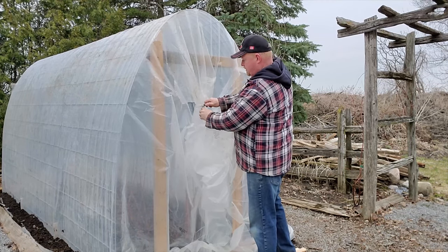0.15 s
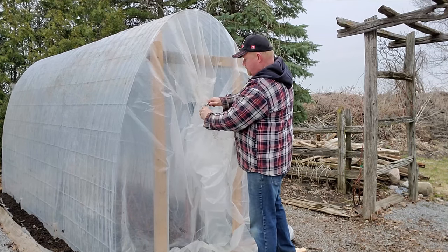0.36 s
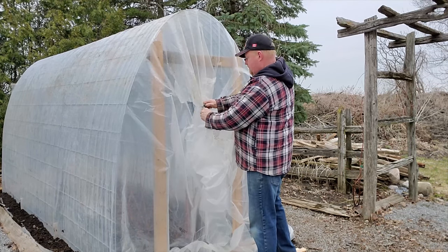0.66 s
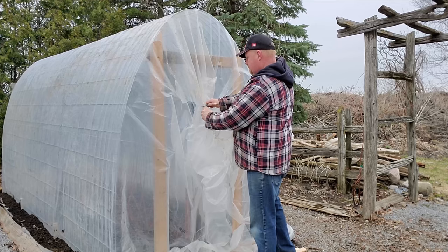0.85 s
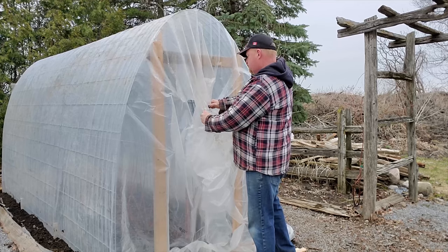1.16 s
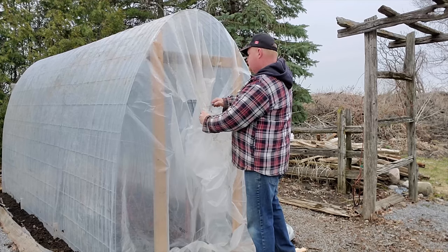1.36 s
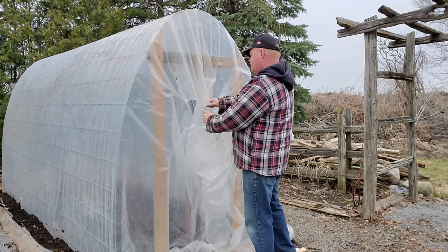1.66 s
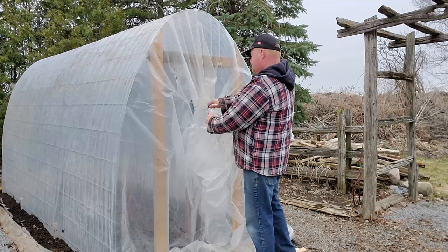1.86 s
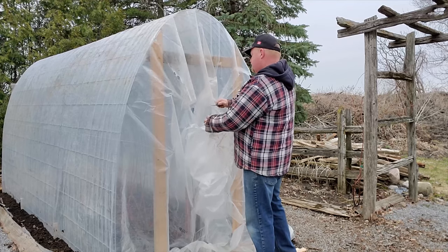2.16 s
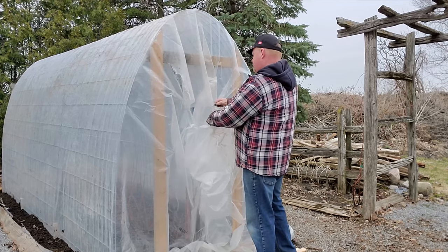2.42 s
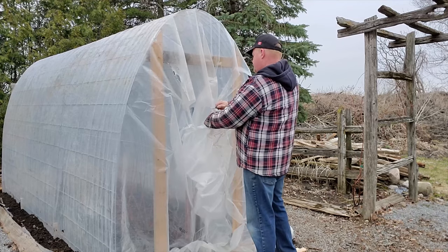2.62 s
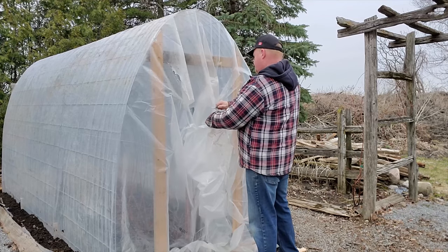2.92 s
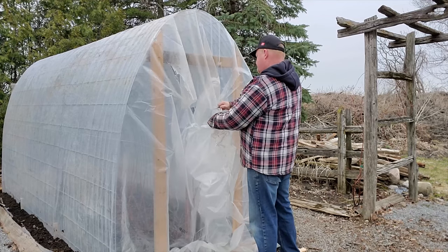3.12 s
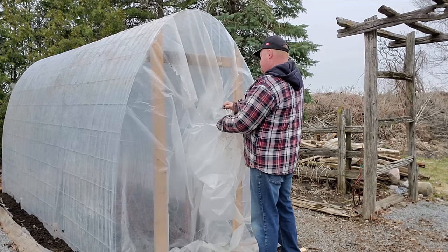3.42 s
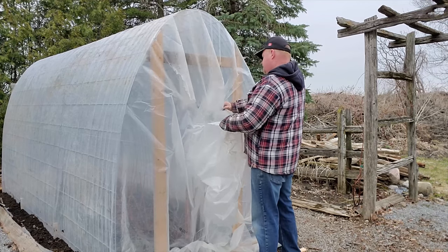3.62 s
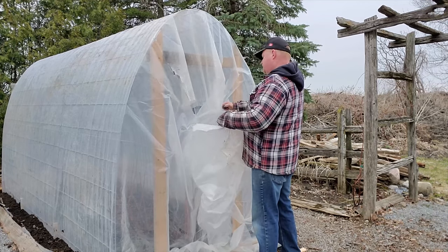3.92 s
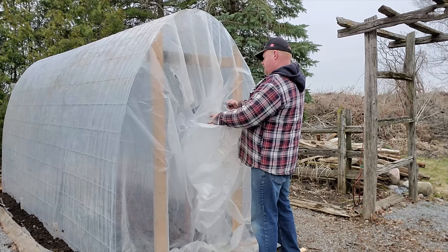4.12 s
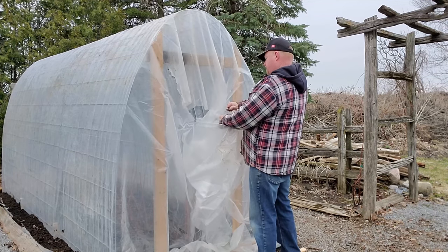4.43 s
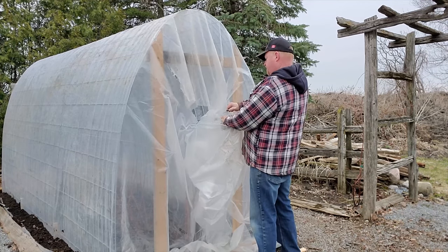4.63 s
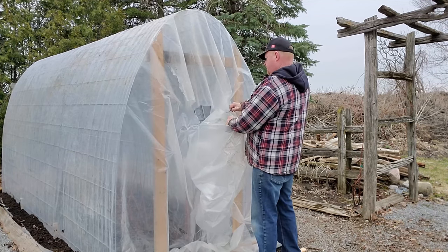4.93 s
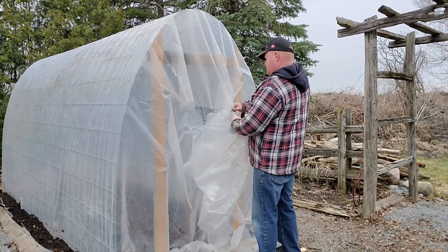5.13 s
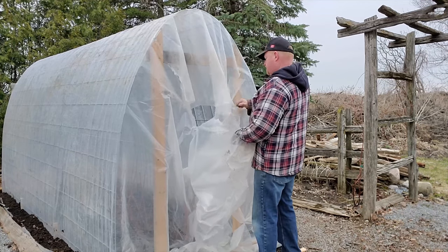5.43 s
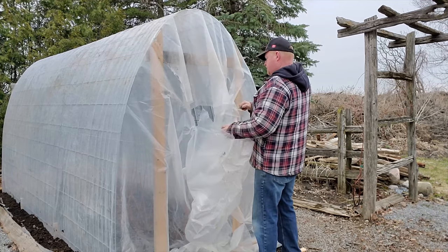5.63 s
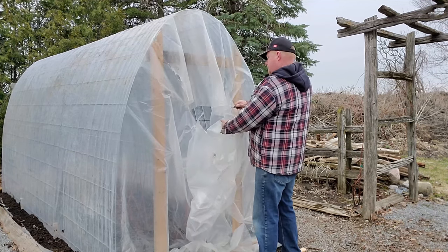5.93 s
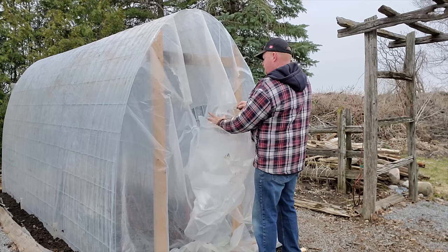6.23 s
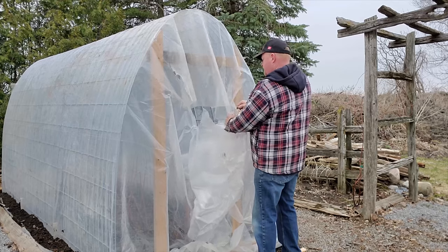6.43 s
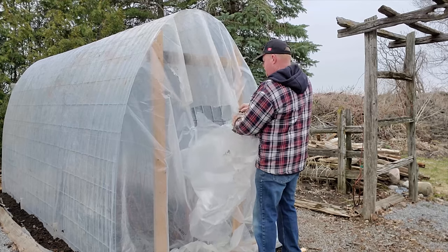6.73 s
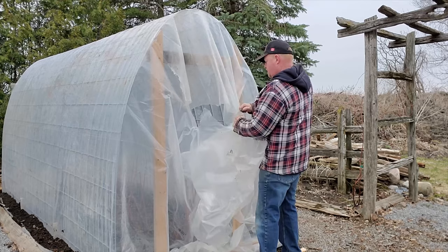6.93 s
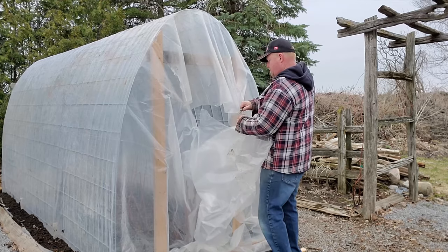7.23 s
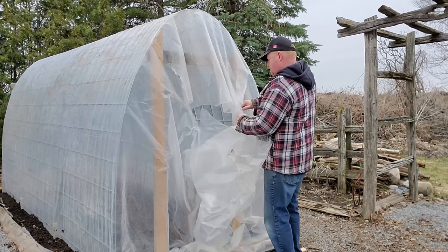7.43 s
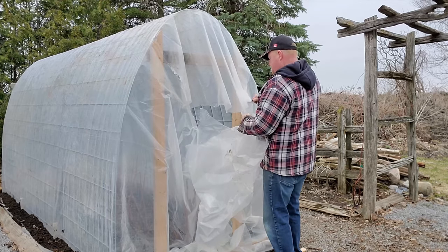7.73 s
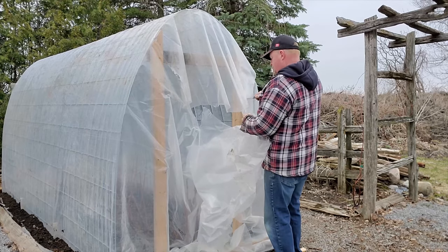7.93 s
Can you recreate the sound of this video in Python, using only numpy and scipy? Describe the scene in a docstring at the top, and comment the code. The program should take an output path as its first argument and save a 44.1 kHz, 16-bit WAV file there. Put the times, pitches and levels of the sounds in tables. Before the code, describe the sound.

Loose plastic sheeting is gathered and tugged by hand outdoors, crinkling and snapping in uneven bursts over a low rumble, with occasional faint bird chips.

```python
"""End of a garden hoop house: clear plastic sheeting is gathered and tugged by hand a few metres away.
Creases snap as short noise bursts; swarms of random wrinkle clicks crackle; small folds pop as brief notes.
The loose sheet flaps and billows as filtered clicks that follow each pull; a high fizz follows more evenly.
Behind it: a low outdoor rumble, steady air noise, gusty breeze noise and the faint chips and whistles of birds."""
import sys
import numpy as np
from scipy import signal
from scipy.fft import rfft, irfft
from scipy.io import wavfile
from scipy.ndimage import uniform_filter1d

SR = 44100
rng = np.random.default_rng(int(sys.argv[2]) if len(sys.argv) > 2 else 0)


def wrap_up_sound(samples):
    """Save the sound to the file named by the first command line argument, as 16-bit audio."""
    columns = np.atleast_2d(samples).T
    # keep every value between -1 and 1, then stretch to whole-number steps
    tamed = np.clip(columns, -1, 1)
    steps = np.round(tamed * 32767).astype(np.int16)
    wavfile.write(sys.argv[1], SR, steps)


N = 355710
TIME = np.arange(N) / SR

# creases that snap: (time [s], relative crack level [dB], fold tightness [dB],
#                     tick relative to crack [dB])
CREASE_SNAPS = [(0.1053, -39.5, 1, -33), (0.1264, -43.5, -7, -18), (0.144, -42.5, 14, -17),
                (0.211, -41.5, 16, -16), (0.235, -40, -3, -24), (0.2886, -38, 11, -22),
                (0.3648, -37, 2, -22), (0.4146, -40.5, 0.5, -11), (0.5274, -40, 5, -24),
                (0.6352, -40.5, 10, -15), (0.719, -45, 3, -30), (0.7655, -52, 15, -3),
                (0.7851, -46.5, 0, -13), (0.8549, -40.5, 5, -14), (0.9548, -37.5, 0, -19),
                (0.9931, -29, 19, -17), (1.0194, -37, -5, -26), (1.044, -34.5, -15, -28),
                (1.2157, -47.5, -3, -30), (1.2567, -46, -1, -17), (1.334, -38, 1, -27),
                (1.4408, -56, 12, -9), (1.545, -52.5, 5, -8), (1.6136, -45.5, 11, -13),
                (1.669, -40, 36, -10), (1.8641, -21.5, 1.5, -32), (1.8686, -30.5, -2, -16),
                (1.8926, -30, -3, -11.5), (1.9663, -41, 4, -28), (2.1121, -45, -5.5, -30),
                (2.2295, -44, -5, -30), (2.3742, -45, 4, -26), (2.434, -36, -3.5, -15),
                (2.4885, -43.5, 1, -34), (2.5193, -35.5, 1, -22), (2.5626, -39, -1, -34),
                (2.5793, -46, -1, -32), (2.681, -43.5, 32, -12), (2.8327, -48, -4, -32),
                (2.8608, -40.5, 0.5, -10), (2.9224, -45.5, -8.5, -9), (2.9414, -47, -2, -3.5),
                (2.9995, -30, -2, -12.5), (3.0465, -25, 4.5, -13.5), (3.0876, -39.5, 8, -9),
                (3.1038, -41, -10, -9), (3.1253, -23, -6, -8.5), (3.207, -38.5, 0, -9),
                (3.3483, -24, -1.5, -9.5), (3.3723, -29.5, 7, -14), (3.4029, -28, 31, -9.5),
                (3.5177, -41.5, -13.5, -13.5), (3.6252, -29, -14, -13), (3.6354, -27.5, 0, -5),
                (3.6842, -28, -9, -14), (3.7557, -21.5, 1, -18), (4.1448, -41, -2, -29),
                (4.1708, -32.5, 10, -40), (4.2126, -34, 11, -18), (4.287, -35, 3, -11),
                (4.3575, -39, 4, -28), (4.432, -43.5, 7, -11), (4.501, -41.5, 6, -35),
                (4.654, -54.5, -9, -34), (4.775, -49, -1, -32), (4.8009, -33, 2, -20),
                (4.8074, -39, 7, -21), (4.8476, -27, 9, -22), (4.9948, -28.5, -5, -12),
                (5.0002, -27, 5, -19), (5.0577, -40, 4, -15), (5.1253, -37, 0, -8), (5.2099, -28, -6, -3.5),
                (5.2168, -34.5, 7, -1), (5.2385, -24.5, 5, -10), (5.2667, -28.5, -10.5, -13),
                (5.3041, -32, -10.5, -25), (5.39, -47, -5, -13), (5.7278, -39.5, 6, -31),
                (5.846, -32, -3, -15), (5.9938, -35, -6, -30), (6.2882, -47.5, -6, -12),
                (6.3182, -38.5, -6.5, -30), (6.3492, -35, 0, -28), (6.3784, -35.5, 15, -11),
                (6.394, -32.5, 14, -29), (6.5447, -44, -1, -20), (6.6533, -44, -5.5, -17),
                (6.9051, -39.5, -2, -32), (6.9796, -48, -4, -10), (7.1163, -34.5, -9, -22),
                (7.3426, -41.5, 12, -12), (7.4233, -36, 20, -16), (7.4592, -31.5, -7, -13),
                (7.4728, -28.5, 0, -18), (7.478, -25.5, -5, -18), (7.5987, -37, -14, -22),
                (7.6834, -38.5, -7, -10), (7.852, -52, -18.5, -32), (7.9238, -48, -10, -19),
                (8.053, -40.5, 15, -9)]
# filter curves of crinkle, broad-fold flap, high fizz, low rumble: (frequency [Hz], level [dB per Hz])
CRINKLE_SPECTRUM = [(250, -34), (550, -6.5), (800, 0), (1600, -1.5), (2700, -5), (4400, -7), (5500, -13.5),
                    (6800, -18), (8000, -32.5), (16000, -32)]
FLAP_SPECTRUM = [(60, 2.5), (130, -4), (200, 1), (320, 3), (500, -1), (650, -5), (900, -12), (2000, -30.5),
                 (6000, -105)]
FIZZ_SPECTRUM = [(3000, -57), (6000, 6), (7500, 0), (10000, -0.5), (12500, 1.5), (15500, 0)]
RUMBLE_SPECTRUM = [(12, -36), (28, -30), (45, -5.5), (68, -1.5), (95, -5.5), (122, -8.5), (150, -25.5),
                   (300, -37), (1000, -79)]


def amp(db):
    """Decibels to linear gain."""
    return 10 ** (np.asarray(db) / 20)


def unit(x):
    """Scales to rms 1."""
    return x / np.sqrt(np.mean(x ** 2) + 1e-20)


def read(points, hz):
    """Reads a spectrum in dB on a log-frequency axis."""
    f, value_db = np.transpose(points)
    return np.interp(np.log(hz + 1), np.log(f + 1), value_db)


def follow(rows, axis):
    """One dB column of a curve, as a gain at every sample."""
    rows = np.array(rows)
    return amp(np.interp(TIME, rows[:, 0], rows[:, axis]))


def colour(x, points, size=4096):
    """Causal minimum-phase filter with the given spectrum, so that attacks stay sharp."""
    hz = abs(np.fft.fftfreq(size, 1 / SR))
    log_gain = np.log(amp(read(points, hz)))
    response = np.exp(np.conj(signal.hilbert(log_gain)))
    taps = np.fft.ifft(response).real[:size // 2]
    taps = taps.reshape((1,) * (x.ndim - 1) + (-1,))
    return signal.oaconvolve(x, taps, axes=-1)[..., :x.shape[-1]]


def steadied(x, span_s):
    """Evens out the level over the span, judged on the mid channel, and keeps the finer grain."""
    size = int(span_s * SR) + 1
    power = uniform_filter1d(uniform_filter1d(x[0] ** 2, size), size)
    return x / np.sqrt(abs(power) + 1e-3 * power.mean())


def add(mix, start_s, sound):
    """Mixes a sound in at its start time."""
    part = mix[:, max(round(start_s * SR), 0):][:, :sound.shape[1]]
    part += sound[:, :part.shape[1]]


def air_noise(level_db=-59):
    """Steady outdoor air: filtered noise, independent at each microphone."""
    # (frequency [Hz], level [dB per Hz])
    air_spectrum = [(30, -3.5), (120, -2), (160, -7), (330, -11.5), (700, -8), (1700, -13.5), (3300, -8.5),
                    (5000, -16.5), (8000, -46), (12000, -51), (16000, -27)]
    return amp(level_db) * unit(colour(rng.standard_normal((2, N)), air_spectrum))


def breeze(gust_db=1.5, size=1700):
    """Eddies buffet each microphone on its own, under shared gusts."""
    # (time [s], level [dB])
    breeze_level = [(0, -73), (5.5, -55.5), (6.3, -57), (6.72, -46), (6.87, -64), (7.3, -46.5),
                    (7.6, -39.5), (8.07, -37.5)]
    gusts = unit(uniform_filter1d(uniform_filter1d(rng.standard_normal(N), size), size))
    eddies = colour(rng.standard_normal((2, N)), RUMBLE_SPECTRUM, size=16384)
    eddies = eddies * amp(gust_db * np.clip(gusts, -2, 2))
    return follow(breeze_level, axis=1) * unit(eddies)


def bird(chip_s=0.046, fall=0.086, rasp=0.15, lower=.84, lower_db=-2, lag_s=0.007, waver_hz=150, size=12):
    """Raspy chips from the two sides of the syrinx, sliding down in pitch; thin rising whistles of far birds."""
    # (time [s], level [dB], pitch [Hz])
    chips = [(.888, -58, 3280), (1.449, -56, 3390), (2.611, -53, 3280), (3.568, -49, 3380),
             (4.361, -47, 3320), (5.501, -48.5, 3426)]
    # (time [s], length [s], level [dB], start pitch [Hz], end pitch [Hz])
    whistles = [(4.66, .065, -67, 4080, 4380), (4.65, .14, -69, 1680, 1780)]
    out = np.zeros((2, N))
    u = np.arange(0, 1, 1 / (chip_s * SR))
    for s, db, hz in chips:
        voices = ((s, db, hz), (s + lag_s, db + lower_db, hz * lower))
        for start_s, voice_db, voice_hz in voices:
            jitter = unit(uniform_filter1d(rng.standard_normal((2, len(u))), size))
            pitch_hz = voice_hz * (1 + fall * (.5 - u) + rasp * jitter)
            turns = np.cumsum(pitch_hz, axis=1) / SR
            chip = np.sin(np.pi * u) * np.sin(2 * np.pi * turns)
            add(out, start_s, amp(voice_db) * unit(chip))
    for s, length_s, db, start_hz, end_hz in whistles:
        u = np.arange(0, 1, 1 / (length_s * SR))
        waver = unit(uniform_filter1d(rng.standard_normal(len(u)), size))
        turns = np.cumsum(start_hz + (end_hz - start_hz) * u + waver_hz * waver) / SR
        whistle = np.sin(np.pi * u) * np.sin(2 * np.pi * turns)
        add(out[:1], s, amp(db) * unit(whistle)[None])
    return out


def pulled(part="crinkle", step=64):
    """How hard one part of the sound is driven: each pull or snap rises, holds and fades; powers add."""
    # pulls of the hands: (start [s], rise [s], hold [s], fade [dB/s], strength [dB],
    #                      broad-fold weight [dB], high-fizz weight [dB])
    tugs = [(0.0, 0.013, 0.1, 150, -51, -7.5, 1), (0.19, 0.015, 0.069, 300, -46, -14, -10),
            (0.391, 0.017, 0.018, 154, -49.5, 0, 4), (0.579, 0.064, 0.0046, 282, -43.5, -2.5, 9),
            (0.705, 0.0092, 0.044, 260, -54.5, 0.5, 1), (0.948, 0.051, .042, 420, -29.5, -3.5, -5),
            (1.069, 0.023, 0.031, 217, -49, 1.5, 7), (1.448, 0.022, 0.013, 250, -68.5, -2, 10),
            (1.525, 0.026, 0.031, 220, -56.5, -2, 1), (1.855, 0.0067, 0.04, 228, -33, -15, -14),
            (1.913, 0.043, 0.046, 238, -39.5, -1, -4), (2.063, 0.049, 0.17, 58, -52.5, -1, 3.5),
            (2.354, .02, 0.073, 164, -47, -2, -6), (2.554, .01, 0.005, 330, -48, -5, -1),
            (2.996, .004, 0.0051, 300, -37.5, 3, 2), (3.064, 0.039, 0.0067, 224, -45.5, 6, 7),
            (3.343, 0.009, .02, 250, -33, -1, 3), (3.622, 0.0044, 0.08, 192, -31, -2, 0),
            (3.788, 0.035, 0.062, 113, -46, -0.5, 4), (3.98, 0.024, .05, 100, -54.5, 1.5, 4),
            (4.131, 0.054, 0.03, 220, -42, -1, -6), (4.328, 0.013, 0.021, 124, -52.5, -4, 7),
            (4.796, 0.0064, 0.034, 240, -37.5, -5.5, -5), (4.919, 0.091, 0.016, 146, -40, -2, -3),
            (5.124, .1, 0.048, 171.5, -27, -3, 0.5), (5.458, 0.038, 0.018, 79, -51, -1, 5),
            (5.708, 0.015, .09, 67, -48, 0, 1), (5.821, 0.027, 0.12, 330, -39.5, -3.5, 0),
            (6.072, 0.033, 0.075, 54, -56, 2.5, 3), (6.273, 0.09, 0.05, 114, -37.5, -4.5, 1),
            (6.527, 0.028, 0.17, 42, -54, -0.5, 0), (6.89, .01, 0.06, 220, -61, 0, 11),
            (7.044, 0.032, 0.017, 120, -54.5, 5.5, -8), (7.117, .01, 0.13, 74, -63.5, 9.5, 17),
            (7.215, 0.033, 0.23, 82, -48, 3, 7.5), (7.442, .025, 0.035, 95, -33, 1, -3),
            (7.571, 0.011, 0.067, 328, -39.5, -14, 5), (7.932, 0.087, .08, 100, -57, 6, 3)]
    # every snap leaves the wrinkles around it stirring for a moment
    stir_db, stir_rise_s, stir_fade_db_per_s = -14.5, .003, 197
    stirs = [(s, stir_rise_s, 0, stir_fade_db_per_s, crack_db + stir_db, -tight_db / 2, 0)
             for s, crack_db, tight_db, _ in CREASE_SNAPS]
    t = TIME[::step]
    power = np.zeros(len(t))
    for start_s, rise_s, hold_s, fade_db_per_s, db, broad_db, fizz_db in tugs + stirs:
        weight_db = {"crinkle": 0, "folds": broad_db, "fizz": fizz_db}[part]
        fading_s = np.maximum(t - start_s - rise_s - hold_s, 0)
        faded_db = np.minimum(fade_db_per_s * fading_s, 100)
        rise = np.clip((t - start_s) / rise_s, 0, 1)
        power += (rise * amp(db + weight_db - faded_db)) ** 2
    return np.interp(TIME, t, np.sqrt(power) + 1e-6)


def flapped(lag_s):
    """The swing of the broad folds, lagging the hands."""
    return np.interp(TIME - lag_s, TIME, pulled("folds"))


def fizz_level(level_db=-58.5, pull_db=-43, slope=0.61, max_fall_db_per_s=131):
    """Level of the high fizz: a compressed follower of the pulls and snaps, with a limited rate of fall."""
    db = level_db + slope * (20 * np.log10(pulled("fizz")) - pull_db)
    fall_db = max_fall_db_per_s * TIME
    return amp(np.maximum.accumulate(db + fall_db) - fall_db)


def wrinkles(per_s, spread_db, cap, gentle_db=-45, crowding=.7):
    """Random instants at which wrinkles give way: most weak, a few strong, more of them in a hard crumple."""
    busy = np.clip((pulled() / amp(gentle_db)) ** crowding, .8, 5)  # scales the base rate per_s
    sizes_db = spread_db * np.minimum(rng.exponential(1, N), cap)
    sizes = amp(sizes_db) / np.sqrt(busy)
    return sizes * (rng.random(N) < busy * per_s / SR)


def facets(clicks, ring_s, scatter_db, scatter_s, count=96, size=1024):
    """Each click shakes one of many facets: a brief burst, then a ripple scattered by the folds (mid, side)."""
    t = np.arange(size) / SR
    which = rng.integers(0, count, N)
    envelope = np.exp(-t / ring_s) + amp(scatter_db) * np.exp(-t / scatter_s)
    shakes = rng.standard_normal((count, 2, size)) * envelope
    out = np.zeros((2, N))
    for i in np.flatnonzero(clicks):
        add(out, i / SR, clicks[i] * shakes[which[i]])
    return out


def billow(lag_s=0.036, pull_db=-4, rumble_db=-59, sway_s=0.021):
    """The sheet shoves the air in uneven lumps after pulls and in sways, over a steady low rumble."""
    # the loose sheet sways and shoves the air once: (time [s], level [dB])
    sways = [(.11, -51), (.22, -52), (.43, -42), (.53, -47), (.645, -45.5), (1.015, -37), (1.62, -44.5),
             (1.93, -37), (2.23, -48), (2.34, -48), (2.77, -48), (3.36, -41), (3.78, -42), (4.59, -50),
             (4.89, -46), (5.09, -44), (5.35, -33.5), (6.01, -42), (7.0, -45)]
    shoves = wrinkles(per_s=130, spread_db=1.5, cap=3.7) * rng.standard_normal((2, N))
    lumps = colour(shoves, RUMBLE_SPECTRUM, size=16384)
    # sway_s is half the length of one sway
    swaying = sum((amp(db) * np.exp(-((TIME - s) / sway_s) ** 2 / 2)) ** 2 for s, db in sways)
    power = (amp(pull_db) * flapped(lag_s)) ** 2 + swaying + amp(rumble_db) ** 2
    return np.sqrt(power) * steadied(lumps, span_s=0.049)


def ping(t, hz, cycles):
    """The note of one fold: it swells within a cycle and dies over several."""
    return (1 - np.exp(-t * hz)) * np.exp(-t * hz / cycles) * np.sin(2 * np.pi * hz * t)


def pops(cycles=7, width=0.39, size=3000):
    """Broad folds pop over, each with a hollow decaying note."""
    # (time [s], level [dB], pitch [Hz])
    fold_pops = [(0.382, -45, 1070), (0.413, -33, 1760), (0.477, -38, 2000), (0.507, -40, 1450),
                 (1.016, -29.5, 225), (1.0445, -34, 487), (1.884, -31.5, 199), (2.114, -37, 1140),
                 (3.608, -33, 910), (3.849, -29.5, 1374), (5.848, -23.5, 1340), (6.287, -28, 1460),
                 (6.319, -29, 1425), (7.116, -43, 474), (7.474, -24, 863), (7.599, -25.5, 760),
                 (7.681, -25, 1360)]
    t = np.arange(size) / SR
    out = np.zeros((2, N))
    for s, db, hz in fold_pops:
        add(out, s, amp(db) * ping(t, hz, cycles) * np.array([[1], [width]]))
    return out


def crackle(low_hz=380, high_hz=4300, cycles=8.7, count=36, size=1500):
    """Small folds pop over at random, each with a pitch and a direction of its own."""
    clicks = wrinkles(per_s=420, spread_db=4.5, cap=3.0) * rng.choice([-1., 1.], N)
    t = np.arange(size) / SR
    hz = np.geomspace(low_hz, high_hz, count)[:, None]
    notes = ping(t, hz, cycles) * (hz / low_hz) ** 0.96  # smaller folds flip faster and harder
    which, side = rng.integers(0, count, N), rng.standard_normal(N)
    out = np.zeros((2, N))
    for i in np.flatnonzero(clicks):
        add(out, i / SR, clicks[i] * np.outer([1, side[i]], notes[which[i]]))
    return amp(-6.0) * pulled() * steadied(out, span_s=0.041)


def ticks(gentle_db=-45, growth=0.92):
    """Tight little creases click out above the rustle, most clearly when the touch is light."""
    clicks = wrinkles(per_s=70, spread_db=3.0, cap=2.2)
    clicked = colour(facets(clicks, ring_s=.0007, scatter_db=-18, scatter_s=.003), CRINKLE_SPECTRUM)
    level = amp(gentle_db) * (pulled() / amp(gentle_db)) ** growth
    return amp(-5) * level * unit(clicked)


def bursts(spectrum, ring_s, tail_db, tail_s, rise_s, jolt, size=4096, jolt_sample=9):
    """One burst a snap: the jolt of the flipping crease, then the ripple that runs on through the sheet."""
    t = np.arange(size) / SR
    decay = np.exp(-t / ring_s) + amp(tail_db) * np.exp(-t / tail_s)
    shape = (1 - np.exp(-t / rise_s)) * decay
    count = len(CREASE_SNAPS)
    drive = rng.standard_normal((count, 2, size)) * shape / np.linalg.norm(shape)
    drive[:, 0, jolt_sample] += jolt * rng.choice([-1., 1.], count)  # mid only: equal at both microphones
    return colour(drive, spectrum)


def headed(x, size):
    """Gives every burst rms 1 over its first samples."""
    return x / np.sqrt(np.mean(x[..., :size] ** 2, axis=-1, keepdims=True))


def snaps(split_hz=2500, thud_db=-9.5, width=0.55):
    """A crease flips: a tick, a crack that is brighter the tighter the fold, and a thud that is softer."""
    s, crack_db, tight_db, tick_db = np.array(CREASE_SNAPS).T[:, :, None, None]
    crack = bursts(CRINKLE_SPECTRUM, ring_s=.0022, tail_db=-12, tail_s=.008, rise_s=.00008, jolt=.6)
    tick = bursts(FIZZ_SPECTRUM, ring_s=0.0027, tail_db=2, tail_s=0.0068, rise_s=.00005, jolt=1.0)
    thud = bursts(FLAP_SPECTRUM, ring_s=0.0026, tail_db=-26, tail_s=0.0071, rise_s=0.00014, jolt=0.7)
    low_pass = signal.butter(2, split_hz, "low", fs=SR, output="sos")
    high_pass = signal.butter(2, split_hz, "high", fs=SR, output="sos")
    dull = headed(signal.sosfilt(low_pass, crack), size=264)
    bright = headed(signal.sosfilt(high_pass, crack), size=264)
    # minus: the two halves are in antiphase at the split
    sound = amp(crack_db + 1.36) * headed(dull - amp(tight_db) * bright, size=264)
    sound += amp(crack_db + tick_db + 2.5) * headed(tick, size=264)
    sound += amp(crack_db + thud_db - tight_db) * headed(thud, size=528)
    out = np.zeros((2, N))
    for start_s, snap in zip(s.ravel(), sound):
        add(out, start_s, snap)
    return out * np.array([[1], [width]])  # snaps come from the hands, nearer the middle than the rustle


def tautened(x, hollow_hz=700, crisp_hz=3300):
    """Taut plastic sounds crisp, slack plastic hollow: two broad bands trade level."""
    # (time [s], tautness [dB])
    tautness = [(0, -0.5), (.6, 2), (1.05, 0.5), (1.9, -2), (2.5, -1.5), (3.1, -0.5), (3.8, -2.5),
                (4.3, -2.5), (5.2, 0), (6, -2), (6.4, -1.5), (6.8, -4.5), (7.2, -2), (7.6, -2)]
    hz = np.fft.rfftfreq(N, 1 / SR) + 1
    spectrum, taut = rfft(x), follow(tautness, axis=1)
    hollow = irfft(spectrum * np.exp(-2 * np.log(hz / hollow_hz) ** 2), N)
    crisp = irfft(spectrum * np.exp(-2 * np.log(hz / crisp_hz) ** 2), N)
    return x + hollow * (1 / taut - 1) + crisp * (taut - 1)


def shaded(x, size=512):
    """Shifting folds aim some pitches at the microphones and hide others: the colour drifts in patches."""
    z = signal.stft(x, nperseg=size)[2]
    patches = rng.standard_normal(z.shape[1:])
    patches = uniform_filter1d(patches, size=6, axis=0)  # across frequency
    patches = unit(uniform_filter1d(patches, size=4, axis=1))  # across time
    patches_db = 3.2 * patches - 1.2
    return signal.istft(z * amp(patches_db), nperseg=size)[1][:, :N]


def rustle(flap_lag_s=0.0045):
    """The same random clicks make the crinkle and the high fizz; broad folds flap below, a little late."""
    clicks = wrinkles(per_s=1900, spread_db=3.5, cap=3.66)
    crinkle = colour(facets(clicks, ring_s=.0006, scatter_db=-11, scatter_s=.004), CRINKLE_SPECTRUM)
    fizz = colour(facets(clicks, ring_s=.0003, scatter_db=-6, scatter_s=.009), FIZZ_SPECTRUM)
    folds = clicks + wrinkles(per_s=350, spread_db=5.0, cap=3.7)
    flap = colour(facets(folds, ring_s=0.0017, scatter_db=-11.5, scatter_s=0.0092), FLAP_SPECTRUM)
    body = amp(-2.5) * pulled() * steadied(crinkle, span_s=0.15)
    body += amp(-0.04) * flapped(flap_lag_s) * steadied(flap, span_s=0.037)
    return shaded(tautened(body)) + fizz_level() * steadied(fizz, span_s=0.053)


def yard(x, decay_s=0.064, delay_s=0.0067, size=13000):
    """Short scatter from the ground, the hoop house and the fence: sparse random decaying echoes."""
    t = np.arange(size) / SR
    sparse = rng.standard_normal((2, size)) * (rng.random((2, size)) < .06)
    taps = sparse * np.exp(-t / decay_s) * (t > delay_s)
    return signal.oaconvolve(x[:1], taps / np.linalg.norm(taps[0]), axes=1)[:, :N]


def microphones(x):
    """Mid and side become left and right; the treble is the most diffuse."""
    # diffuseness: (frequency [Hz], side gain [dB])
    side_spread = [(30, -5), (65, -22), (130, -18), (280, -18.5), (700, -12.5), (1500, -7.5), (3500, -5.5),
                   (7000, -1.5), (15000, 1)]
    # lean to the left: (frequency [Hz], left minus right [dB])
    left_lean = [(50, -0.5), (200, 0.5), (800, 2), (4000, 1.5), (9000, 6.5), (14000, 7)]
    hz = np.fft.rfftfreq(N, 1 / SR)
    mid, side = rfft(x)
    side = side * amp(read(side_spread, hz))
    lean = amp(read(left_lean, hz) / 2)
    return irfft(np.array([(mid + side) * lean, (mid - side) / lean]), N)


def scene():
    """The sheet in its yard, the birds, steady air and the breeze."""
    sheet = pops() + tautened(crackle() + ticks()) + snaps() + rustle()
    outdoors = sheet + amp(-22) * yard(sheet)
    return air_noise() + breeze() + microphones(bird() + billow() + outdoors)


def record(dry, low_cut_hz=36, edge_hz=16000):
    """The microphones lose the deepest bass; then the band limit of the recorder."""
    low_cut = signal.butter(2, low_cut_hz, "high", fs=SR, output="sos")
    heard = signal.sosfilt(low_cut, dry)
    band_limit = signal.firwin(511, edge_hz, window=("kaiser", 9), fs=SR)
    return signal.oaconvolve(heard, band_limit[None], "same", axes=1)


dry = scene()
out = record(dry)
wrap_up_sound(out)
```